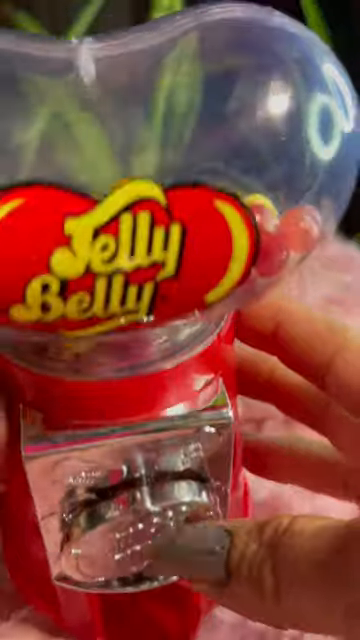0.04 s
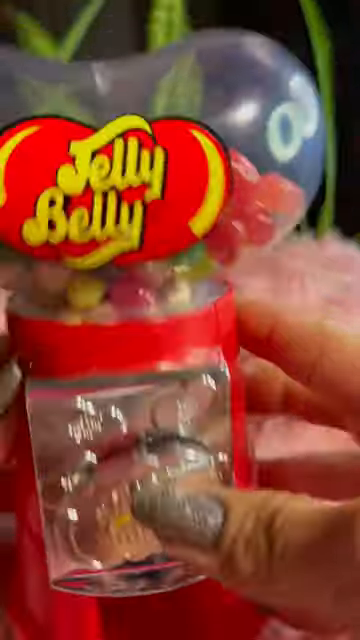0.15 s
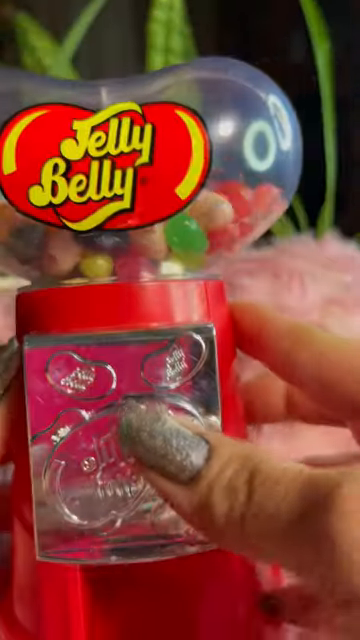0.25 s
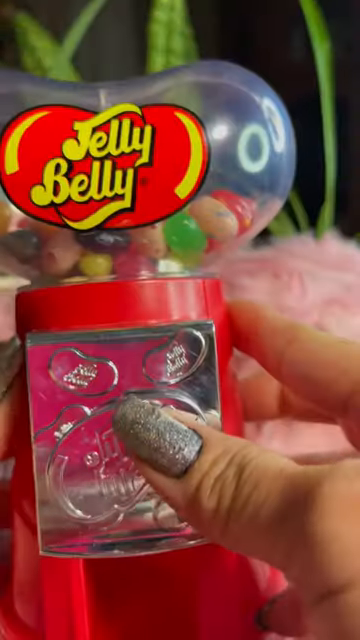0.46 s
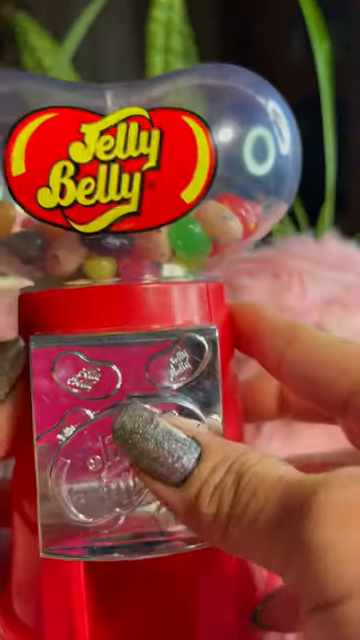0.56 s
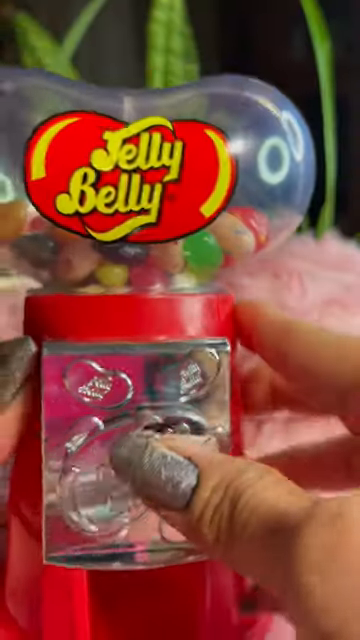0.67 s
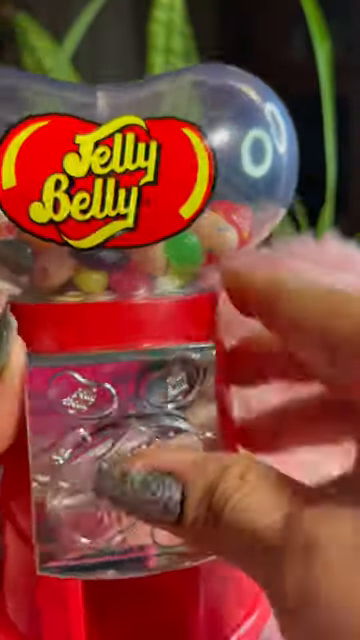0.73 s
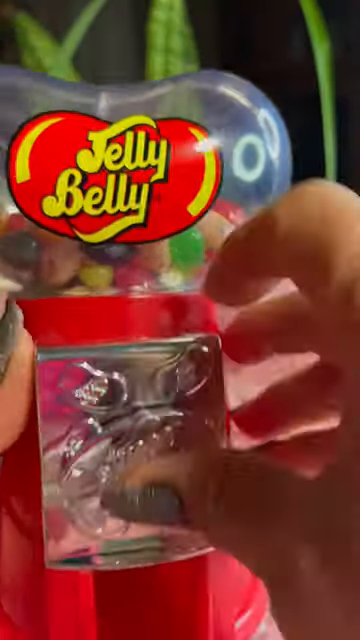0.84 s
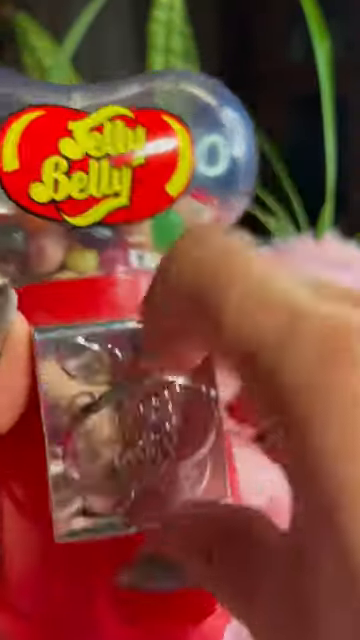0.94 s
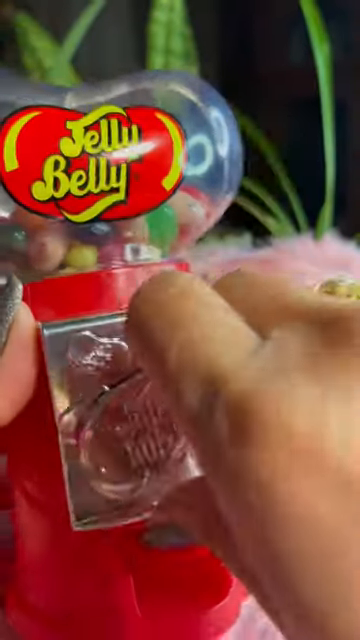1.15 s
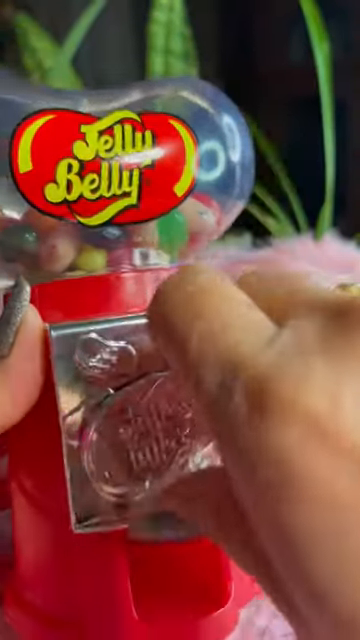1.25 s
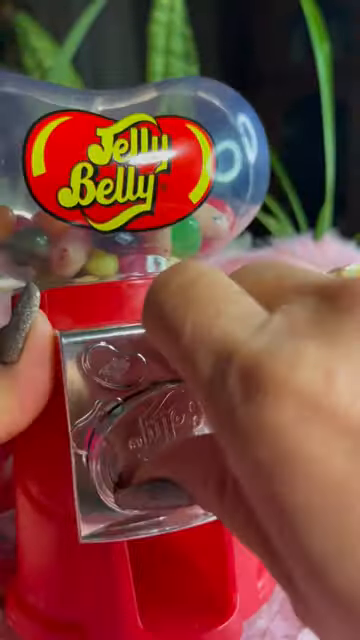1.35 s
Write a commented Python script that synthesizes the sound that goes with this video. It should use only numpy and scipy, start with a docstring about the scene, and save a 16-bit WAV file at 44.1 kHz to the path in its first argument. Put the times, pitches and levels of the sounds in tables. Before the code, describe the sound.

Jelly beans rattle in a plastic candy dispenser, heard close up in a quiet room. After a few faint finger ticks, it lands with a soft, low thump at about 0.2 seconds, and the beans clatter brightly against the globe, settling by 0.45 seconds. From 0.5 to 1.4 seconds, fingers and long nails tick and rub more quietly on the housing and metal front, with a sharper knock near 0.7 seconds.

```python
"""Fingers tick and rub lightly on a plastic candy dispenser in a quiet room. Tipped upright, it lands
on a soft cover with a low thump, and the beans inside tumble against the globe, make it ring and settle.
Then fingers and long nails tick, rub and knock on the housing and its metal front.
A close microphone hears it all through two openings (ports), one left and one right."""
import sys
import numpy as np
from scipy import signal
from scipy.fft import rfft, irfft
from scipy.io import wavfile
from scipy.ndimage import uniform_filter1d

SR = 44100
rng = np.random.default_rng(int(sys.argv[2]) if len(sys.argv) > 2 else 0)


def inscribe(sig):
    """Save sig as 16-bit PCM at rate SR to the path in sys.argv[1].

    A 1-D sig is mono; a 2-D sig holds one channel per row.
    Samples are clipped to [-1, 1] before scaling.
    """
    pcm = np.round(np.clip(np.atleast_2d(sig).T, -1, 1) * 32767)
    wavfile.write(sys.argv[1], SR, pcm.astype(np.int16))


N = 61739


def amp(db):
    """Turns decibels into a number to multiply by."""
    return 10 ** (np.asarray(db) / 20)


def unit(x):
    """Scales a sound so that its energy is 1."""
    return x / np.sqrt(np.sum(x ** 2, -1, keepdims=True) + 1e-20)


def curve(points, at):
    """Joins points by straight lines."""
    return np.interp(at, *np.transpose(points))


def add(mix, start_s, sound):
    """Lays a sound into the mix."""
    part = mix[max(round(start_s * SR), 0):][:len(sound)]
    part += sound[:len(part)]


def colour(points, size=4096):
    """Makes a filter from points of pitch in Hz and level in dB."""
    hz, db = np.transpose(points)
    all_hz = abs(np.fft.fftfreq(size, 1 / SR)) + 1
    log_gain = np.log(amp(np.interp(np.log(all_hz), np.log(hz), db)))
    spectrum = np.exp(np.conj(signal.hilbert(log_gain)))  # nothing sounds before its cause
    return np.fft.ifft(spectrum).real[:size // 2]


def through(x, response):
    """Passes a sound through a filter or an echo."""
    return signal.fftconvolve(x, response)[:N]


def dying(fade_s, rise_s=0.00044):
    """Many vibrations at once: noise that builds quickly, then falls 60 dB in fade_s seconds."""
    t = np.arange(SR // 2) / SR
    return unit(rng.standard_normal(len(t)) * (1 - np.exp(-t / rise_s)) * amp(-60 * t / fade_s))


def fading_tone(hz, fade_s):
    """One vibration that falls 60 dB in fade_s seconds."""
    t = np.arange(SR // 2) / SR
    return np.sin(2 * np.pi * hz * t) * amp(-60 * t / fade_s)


def room_air():
    """The quiet rumble and hiss of the room."""
    # Each row: pitch in Hz, relative level in dB.
    air_colour = [(20, -5), (45, 1), (70, 1), (110, -4), (200, -9), (330, -12), (550, -17), (780, -11),
                  (1100, -21), (2500, -28), (6000, -35), (12000, -38)]
    return amp(-62) * through(rng.standard_normal(N), unit(colour(air_colour)))


def tiny_contacts(levels, tone_colour, per_s, spread_db, fade_s, spots=12):
    """Many small contacts of random size, each on one of several spots that ring differently."""
    sizes = amp(spread_db * np.minimum(rng.exponential(1, N), 4))
    hits = sizes * (rng.random(N) < per_s / SR)
    hits = unit(hits) * np.sqrt(N) * amp(curve(levels, np.arange(N) / SR))
    spot = rng.integers(0, spots, N)
    ringing = sum(through(hits * (spot == k), dying(fade_s)) for k in range(spots))
    return through(ringing, unit(colour(tone_colour)))


def skin_rub():
    """Skin slides over the plastic in thousands of tiny slips."""
    # Each row: time in seconds, level in dB.
    rub_levels = [(0, -60), (.09, -53), (.13, -57), (.17, -52), (.44, -66), (.48, -80), (.52, -64),
                  (.62, -56), (.66, -47.5), (.685, -55.5), (.745, -45), (.78, -56.5), (.85, -59),
                  (.9, -56.5), (.97, -48), (1.01, -64), (1.06, -61), (1.11, -96), (1.15, -78),
                  (1.22, -59.5), (1.27, -79), (1.33, -96), (1.4, -96)]
    # Each row: pitch in Hz, relative level in dB.
    skin_colour = [(100, 1.5), (330, 7), (550, 0), (800, 8), (1200, 3), (2300, 1), (4500, 1), (6500, 1),
                   (8500, -1.5), (11300, 5.5), (12500, 0)]
    return tiny_contacts(rub_levels, skin_colour, per_s=5000, spread_db=1.5, fade_s=.006)


def base_thumps(hz=69, length_s=0.1):
    """The base meets the soft cover: a low tone swells and dies in a few cycles."""
    # Each row: start in seconds, level in dB.
    thumps = [(.003, -58.5), (0.189, -27.5), (0.677, -51.5)]
    out, t = np.zeros(N), np.arange(0, length_s, 1 / SR)
    swell = np.sin(np.pi * (t / length_s) ** 0.43) ** 2  # quick rise, slower fall
    for start_s, db in thumps:
        add(out, start_s, -amp(db) * swell * np.sin(2 * np.pi * hz * t))
    return out


def click(band_db, edges_hz, fade_s, snap, size=4096):
    """A hard contact and its short ring; more snap favours the contact over the ring."""
    hz = np.fft.rfftfreq(size, 1 / SR) + 1
    treble = 1 / (1 + (4700 / hz) ** 4)  # the share that dies faster
    slow, fast = dying(fade_s)[:size], dying(fade_s / 1.8)[:size]
    spectrum = snap + np.sqrt(1 - treble) * rfft(slow) + np.sqrt(treble) * rfft(fast)
    spectrum /= np.sqrt(uniform_filter1d(abs(spectrum) ** 2, size=70))  # even out broad bumps
    burst = np.roll(irfft(spectrum), 16)[:size // 2]
    low, high = np.array(edges_hz[:-1]), np.array(edges_hz[1:])
    db = band_db + 10 * np.log10(.005 * SR * SR / 2 / (high - low))  # 5 ms of energy spread over each band
    shape = [(low[0] / 4, db[0] - 26), (low[0] / 2, db[0] - 18), *zip((low + high) / 2, db)]
    return signal.fftconvolve(burst, colour(shape))


def ring(hz, db, cycles=29.5, longest_s=0.051, rise_s=0.0028):
    """The main note of a struck part builds and dies; high notes die sooner."""
    tone = fading_tone(hz, min(cycles / hz, longest_s))
    rise = 1 - np.exp(-np.arange(len(tone)) / SR / rise_s)
    return amp(db + 4.5) * tone * rise


def finger_taps():
    """Each nail or finger clicks, rings the part it touches and leaves a faint tail in the housing."""
    # Each row: start in seconds, six band levels from low to high, ring pitch in Hz, ring level.
    # Levels are in relative dB.
    taps = [(0.0065, -46.5, -50, -67, -73, -57, -78, 1566, -33),
            (0.02, -41.5, -39.5, -41, -53, -49.0, -39, 736, -38.5),
            (0.0272, -40, -56, -72, -79, -71, -73, 176, -47),
            (0.0631, -89, -34.5, -51, -86, -59, -73, 1550, -81),
            (0.0884, -62, -62, -67, -50.5, -57.0, -52, 960, -63),
            (0.0957, -53, -57.5, -47, -48.5, -51, -60, 850, -61),
            (0.1634, -69, -50, -58, -51, -47, -50, 1386, -35.5),
            (0.5471, -59, -44.5, -48.5, -46.5, -45, -47.5, 1220, -57),
            (0.595, -81, -58, -71, -81, -56.5, -51.5, 784, -45.5),
            (0.653, -65, -50, -44, -55.5, -42, -74, 887, -41),
            (0.665, -58, -49, -51.0, -48, -45, -65, 745, -48),
            (0.7015, -58, -54, -38.5, -50, -41.5, -68, 1860, -29),
            (0.7081, -50, -46, -41, -48.0, -43, -55, 1240, -42),
            (0.7139, -59, -38, -50, -45, -57, -53, 1270, -52),
            (0.7193, -52, -52, -37, -50, -48.0, -54, 1327, -27),
            (0.7251, -49, -25.5, -35, -34, -33.5, -45, 1255, -17),
            (0.728, -47, -33.5, -74, -58, -57, -31.5, 1222, -27.5),
            (0.7373, -45.5, -45.0, -40, -40.5, -33, -101, 795, -41),
            (0.8003, -55, -63, -53, -65, -53, -49.5, 830, -67),
            (0.8713, -40, -43, -39.5, -36.5, -36.5, -36.5, 311, -38.5),
            (0.9318, -57, -54, -53, -55, -42.5, -44.5, 1313, -37),
            (0.94, -47, -52, -49, -60.0, -43, -63, 870, -45.5),
            (0.9542, -51, -47.5, -36.5, -44.5, -35.5, -37.5, 900, -41.5),
            (0.9651, -72, -65, -38, -57.0, -54, -44, 695, -44),
            (0.9744, -58, -49, -51.5, -51, -57, -67, 730.0, -55),
            (1.018, -63, -60, -60, -52, -55, -66, 842, -52.5),
            (1.0264, -62, -48.5, -39, -42, -50, -38, 1700, -44),
            (1.0349, -80, -60.0, -52.0, -44.5, -64, -45, 1210.0, -49),
            (1.0901, -78, -49, -68, -65.5, -84, -77.0, 785, -45),
            (1.1319, -68.5, -60.0, -69, -73, -60, -76, 680, -62),
            (1.1539, -48, -41.5, -57.5, -56, -58.5, -51, 1020, -48.0),
            (1.2353, -50.5, -51.5, -53.0, -45, -35, -30, 765, -73),
            (1.2904, -65, -48.5, -39.5, -50.0, -36, -35.5, 1193, -33),
            (1.3111, -70, -49.5, -49.5, -60.5, -50, -46.0, 853, -42.5),
            (1.3944, -54.5, -58.5, -44, -57.5, -50, -52, 746, -53.5)]
    # The borders of the six bands, in Hz.
    edges_hz = [200, 600, 1600, 3500, 5000, 8000, 12500]
    out = np.zeros(N)
    for start_s, *band_db, ring_hz, ring_db in taps:
        tick = amp(-2) * click(band_db, edges_hz, fade_s=0.019, snap=.6)
        add(out, start_s, tick)
        add(out, start_s, amp(-17) * through(tick, dying(fade_s=0.11)))
        add(out, start_s, ring(ring_hz, ring_db))
    return out


def tumbling_beans():
    """The heap slides, single beans strike the wall, and the globe rings with all of them."""
    # Each row: time in seconds, level of the sliding heap in dB.
    slide_levels = [(.165, -85), (.18, -46.5), (.2, -28.5), (.213, -19.5), (.235, -22), (.27, -25.5),
                    (.3, -28), (.325, -35.5), (.352, -38.5), (.385, -49), (.415, -42), (.45, -64.5)]
    # Each row: pitch in Hz, relative level in dB.
    heap_colour = [(100, -22), (220, -18), (330, 2.5), (520, -1.5), (850, 5.5), (1100, -2), (2200, 4.5),
                   (3500, -4.5), (4800, 5), (6200, 0), (8500, -9), (11300, -1.5), (12500, -4.5), (14500, 0)]
    # Each row: start in seconds, four band levels from low to high, ring pitch in Hz, ring level.
    # Levels are in relative dB.
    clacks = [(0.1668, -50, -49.5, -40.0, -42.5, 1450, -36), (0.1995, -39, -29.5, -33, -28.5, 1830, -18),
              (0.2099, -30.5, -30.5, -23, -23, 5950, -9), (0.2131, -26, -27.5, -18.5, -24, 5820, -18),
              (0.218, -26.5, -22, -16.5, -19, 6350, -25), (0.238, -26, -28, -21.5, -16.5, 6030, -21),
              (0.2494, -36, -27.5, -31, -22, 5750, -32), (0.2591, -29, -21.5, -18, -19.5, 6060, -25),
              (0.2683, -37, -29.5, -25.5, -27, 6390, -27), (0.2784, -35.5, -54, -19.5, -25.5, 7200, -29),
              (0.2873, -30, -33, -23, -19, 6050, -30), (0.3112, -33.5, -29, -29.5, -25.5, 1930, -13),
              (0.3334, -33, -30.0, -27.5, -24.5, 2040, -16), (0.337, -31, -27, -36, -30.0, 1960, -26),
              (0.3619, -41, -36, -38, -31, 2430, -24), (0.3653, -43.0, -39, -43, -37, 2220, -41),
              (0.372, -34.5, -33.5, -32, -27.0, 2260, -51), (0.383, -32.5, -37, -29, -29.5, 2210, -21.5),
              (0.3864, -37.5, -37, -33, -30, 1930, -45), (0.3958, -40, -39.5, -40, -39.0, 2770, -45),
              (0.4067, -45.5, -45, -43, -40, 6410, -50)]
    # The borders of the four bands, in Hz.
    edges_hz = [250, 1600, 5000, 8000, 12500]
    # Each row: pitch in Hz, relative level in dB.
    globe_notes = [(325, -29), (843, -28), (889, -18.5), (1460, -33), (1826, -44), (2052, -52), (2594, -36),
                   (3017, -20.5), (3850, -28), (5738, -48), (6057, -22.5), (6356, -23.5), (7300, -26),
                   (11457, -27.5)]
    hits = tiny_contacts(slide_levels, heap_colour, per_s=2600, spread_db=2, fade_s=.008)
    for start_s, *band_db, ring_hz, ring_db in clacks:
        add(hits, start_s, amp(-1.5) * click(band_db, edges_hz, fade_s=0.0077, snap=0.55))
        add(hits, start_s, ring(ring_hz, ring_db))
    globe = sum(amp(db) * unit(fading_tone(hz, fade_s=.085)) for hz, db in globe_notes)
    tail = amp(-14.5) * dying(fade_s=0.027)
    return hits + through(hits, globe + tail)


def scene():
    """Each port hears the dispenser with its own timing and close echoes; the room answers faintly."""
    # Each row: pitch in Hz, how far the left port's wave is ahead of the right's in radians.
    left_lead = [(0, 0), (2000, 0), (3050, 1.4), (4000, .7), (4600, 2), (5000, 4.1), (5700, 6.1),
                 (7000, 7.2), (9000, 9.4), (12000, 12.2), (16000, 13.1)]
    # Each row: pitch in Hz, level of the close echoes in dB.
    echo_colour = [(40, -30), (400, -20), (1200, -17), (2500, -11), (4200, -10), (6500, -15), (12000, -16)]
    dispenser = tumbling_beans() + skin_rub() + finger_taps() + base_thumps()
    spectrum = rfft(dispenser + room_air(), 2 * N)
    lead = curve(left_lead, np.fft.rfftfreq(2 * N, 1 / SR))
    ports = []
    for side in (1, -1):  # left, right
        direct = irfft(spectrum * np.exp(.5j * side * lead))[:N]
        echoes = through(through(dispenser, dying(fade_s=.012)), colour(echo_colour))
        room = amp(-36) * through(dispenser, dying(fade_s=.18))
        ports.append(direct + echoes + room + amp(-7) * room_air())
    return np.array(ports)


def record(dry):
    """The whole sound is slightly hollow near 460 Hz and soft in the highest treble."""
    # Each row: pitch in Hz, change in level in dB.
    overall_tone = [(20, 0), (310, 0), (460, -4), (750, 0), (11700, 0), (12500, -7), (13300, -19),
                    (14000, -32), (16000, -44)]
    heard = np.array([through(port, colour(overall_tone)) for port in dry])
    treble_cut = signal.firwin(511, 16400, window=("kaiser", 9), fs=SR)  # cuts above 16400 Hz
    return signal.oaconvolve(heard, treble_cut[None], "same")


dry = scene()
out = record(dry)
inscribe(out)
```